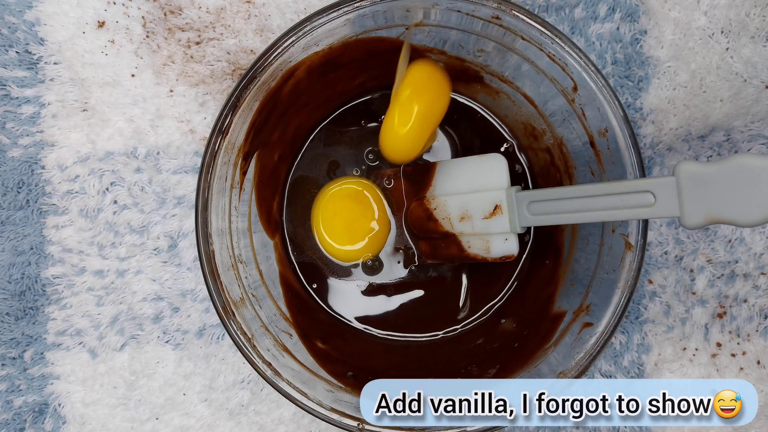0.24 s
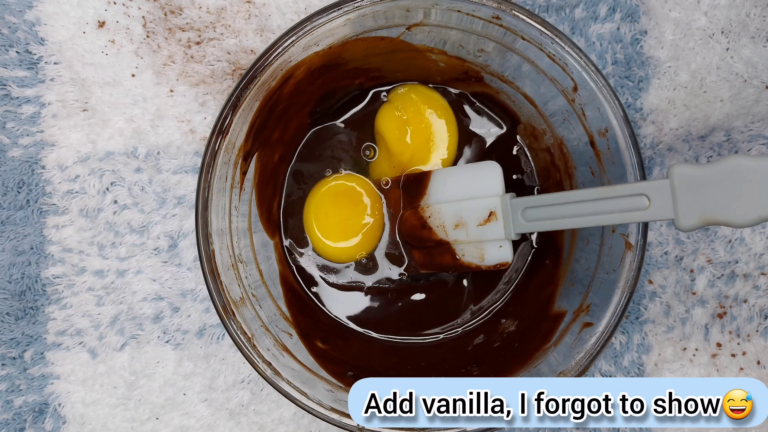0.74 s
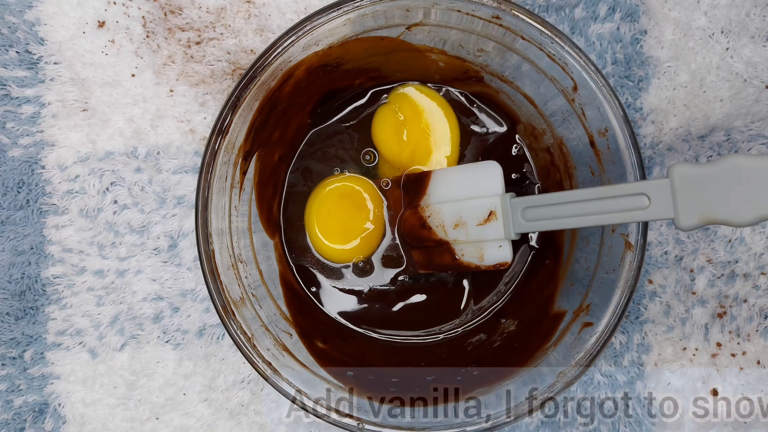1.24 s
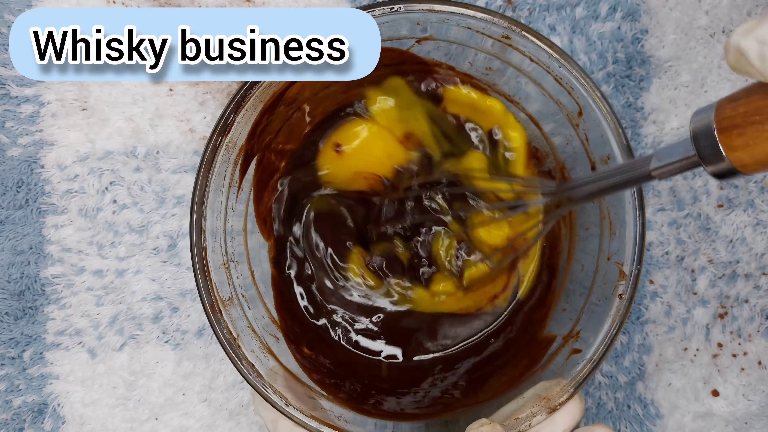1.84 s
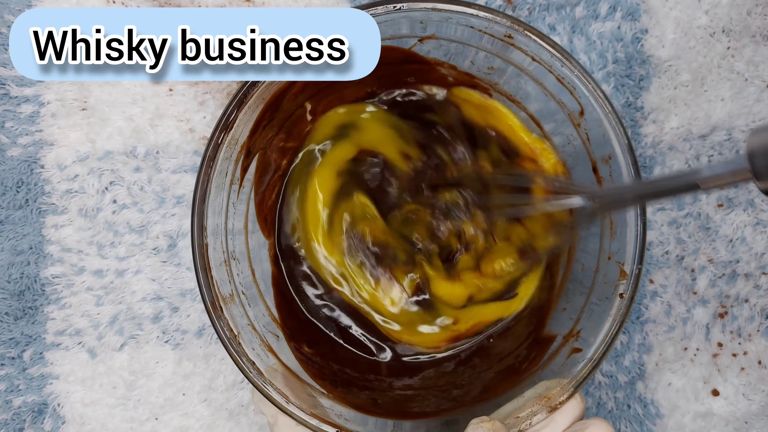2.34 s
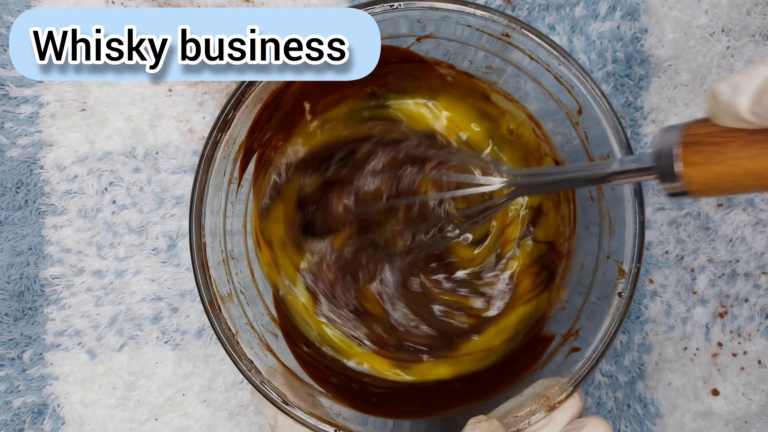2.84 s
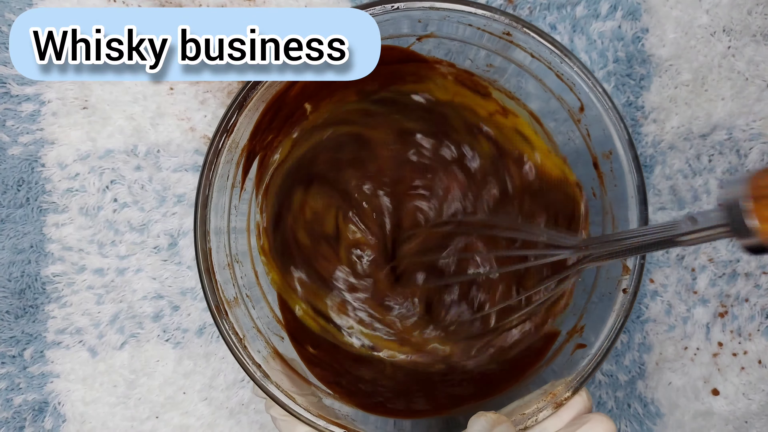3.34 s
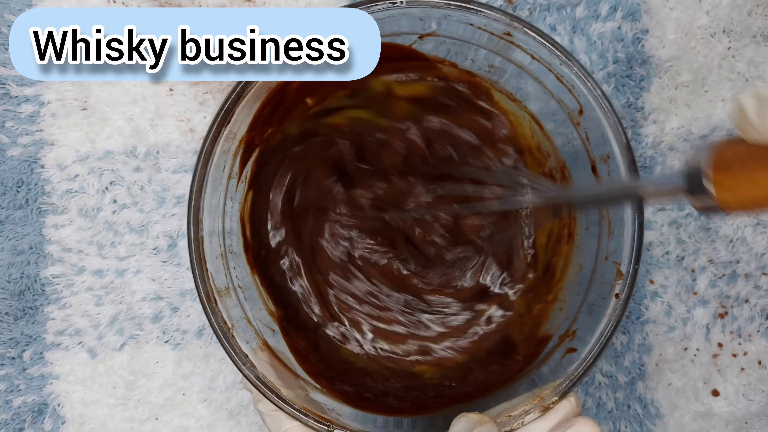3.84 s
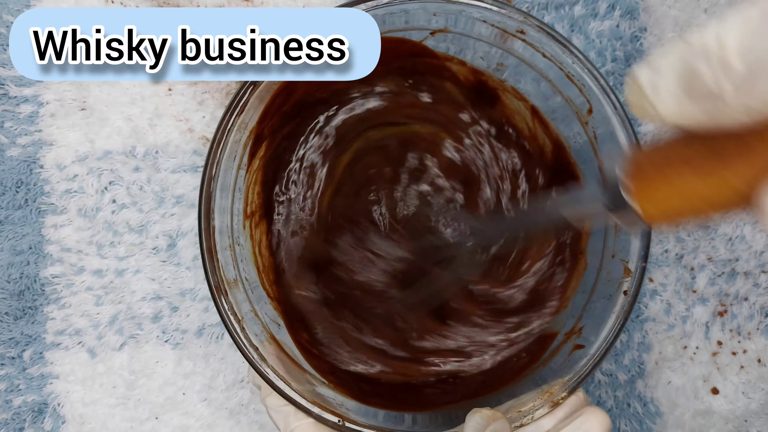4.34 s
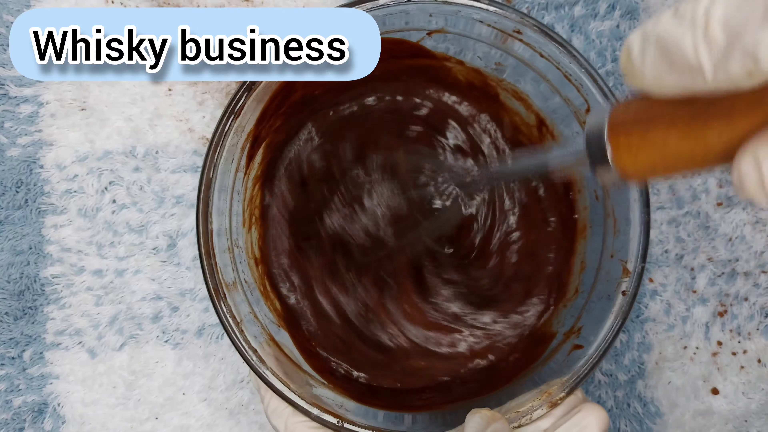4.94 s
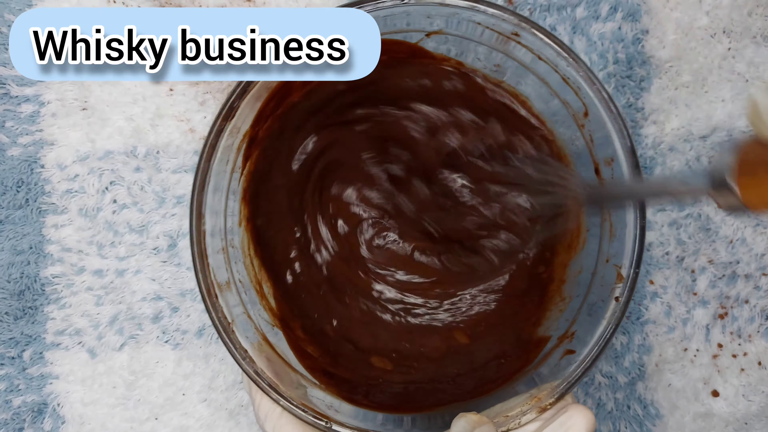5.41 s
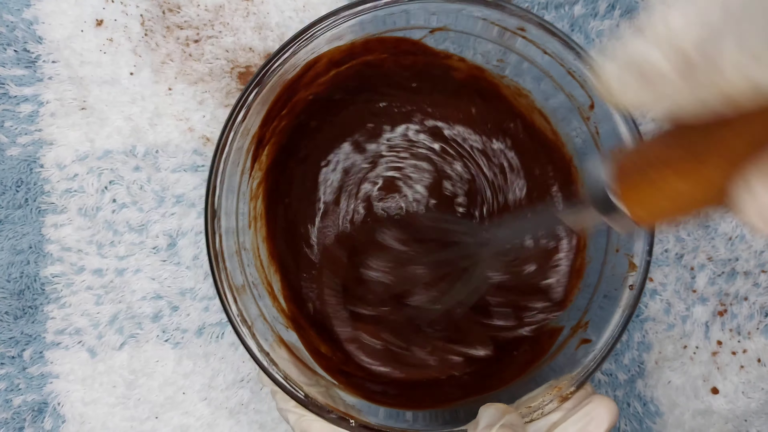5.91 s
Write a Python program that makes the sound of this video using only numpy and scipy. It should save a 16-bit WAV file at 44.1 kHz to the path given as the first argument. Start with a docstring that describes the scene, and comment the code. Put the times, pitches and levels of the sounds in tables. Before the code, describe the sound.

A faint, low fridge hum and a light hiss run throughout, in a quiet kitchen. At about 0.3 seconds an egg slides into a bowl of batter with a soft wet rustle and a small splashy plop. Only the background follows until about 1.4 seconds, when a wire whisk starts beating the thick batter, close to the microphone. The wires drag along the glass bowl in quick, uneven, scratchy swishes, roughly five a second. Sharp little ticks of single wires stand out, mixed with tiny wet pops and occasional soft knocks on the bowl wall. The glass is damped and hardly rings. The strokes are strongest around 1.8 to 2.3 seconds and again around 3.7 to 3.9 seconds. After that the swishing is somewhat softer and smoother, while the clicking carries on until the end at about 6 seconds.

```python
"""Whisking batter in a glass bowl

An egg plops in, then a wire whisk beats thick batter in a glass bowl on a towel, close under a phone
with two microphone ports. Each stroke drags the wires along the damped glass in stick-slip; single
wires tick, wet pockets pop and the wall takes soft knocks. A fridge hums over faint kitchen hiss."""
import sys
import numpy as np
from scipy import signal
from scipy.fft import rfft, irfft
from scipy.io import wavfile
from scipy.ndimage import uniform_filter1d, map_coordinates

SR = 44100
rng = np.random.default_rng(int(sys.argv[2]) if len(sys.argv) > 2 else 0)


def pcm_store(signal):
    """Save signal as 16-bit PCM."""
    levels = np.round(np.clip(np.atleast_2d(signal), -1, 1) * 32767)
    wavfile.write(sys.argv[1], SR, levels.astype(np.int16).T)


N = 272097
TIME = np.arange(N) / SR
BLOW_SAMPLES = 6000
LAG_S, LAG_WANDER_S = .00007, .00004  # the right port hears the moving whisk later
SWISH_START_S = 1.5  # from here on the wires keep swishing faintly between strokes

# rim modes of the glass, damped by batter and towel: pitch_hz, width_hz, level_db
RIM_MODES = [(1920, 155, 1.5), (2567, 230, 4.5), (2999, 153, -1), (3665, 180, -1.5), (4210, 330, -3),
             (5340, 185, -4.5)]


def undb(db):
    return 10 ** (np.asarray(db) / 20)


def unit(x):
    return x / np.sqrt(np.mean(x ** 2))


def decay(t, t60_s):
    return np.exp(-np.log(1000) * t / t60_s)


def pan(x, left_minus_right_db):
    return x * undb(np.outer([.5, -.5], left_minus_right_db))


def delay(x, lag_s):
    return map_coordinates(x, [np.arange(len(x)) - lag_s * SR], order=3)


def wander(rate_hz):
    """Smooth random drift with a spread near 1."""
    step = int(SR / rate_hz)
    held = rng.standard_normal(3000)[np.arange(N) // step]
    return 1.3 * uniform_filter1d(uniform_filter1d(held, step), step)


def ring(x, hz, width_hz):
    """One resonance, gain 1 at its centre."""
    return signal.lfilter(*signal.iirpeak(min(hz, .45 * SR), hz / max(width_hz, 1), fs=SR), x)


def body(x, modes, shift_db=0.):
    """Resonances of alternating sign; as the point of contact moves they trade the same energy."""
    gains = [undb(db + (shift_db * wander(45) if shift_db else 0)) for _, _, db in modes]
    ringing = sum((-1) ** k * gains[k] / np.sqrt(width) * ring(x, hz, width)
                  for k, (hz, width, _) in enumerate(modes))
    return ringing / np.sqrt(sum(gain ** 2 for gain in gains))


def fridge(hum_hz=174.7, drift_hz=0.78):
    """A swelling, sinking hum and wavering narrow drones, the lowest nearly alike at both ports."""
    # swell of the fridge tone: time_s, level_db
    swell = [(0.0, -62), (0.01, -61.5), (0.89, -63.5), (1.13, -55.5), (1.44, -60.5), (1.65, -56),
             (2.94, -64), (3.13, -70.5), (3.32, -62), (3.44, -74.5), (3.61, -61.5), (4.09, -59.5),
             (4.43, -57.5), (4.76, -67.5), (5.6, -61), (6.17, -62)]
    # room resonances stirred by the fridge: pitch_hz, width_hz, level_db
    drones = [(66.6, 8.2, -63.5), (109.2, 8.8, -72.5), (130.5, 27, -70), (192, 11.7, -72.5),
              (367.7, 33, -79), (658, 6.5, -85), (867, 4.4, -90.5)]
    phase = 2 * np.pi * np.cumsum(hum_hz + drift_hz * wander(5)) / SR
    hum_db = np.interp(TIME, *np.transpose(swell)) + 1.4 * wander(16)
    out = np.sqrt(2) * undb(hum_db) * np.sin(phase + np.array([[.15], [-.15]]))
    for hz, width, db in drones:
        mid, side = (unit(ring(rng.standard_normal(N), hz, width)) for _ in range(2))
        spread = min(0.15 * np.sqrt(hz / 65), 1)
        out += undb(db) * (mid + spread * side * np.array([[1], [-1]]))
    return out


def kitchen_hiss(wide_above_hz=500, lift_at_s=0.87, lift_db=2.5):
    """Room tone, centred in the bass and wide in the treble, which steps up ahead of the whisking."""
    # colour of the room tone: frequency_hz, density_db (per Hz)
    spectrum = [(25, -100), (50, -90), (80, -104.5), (110, -88), (200, -97.5), (300, -101), (500, -107),
                (1200, -117), (3000, -122), (8000, -135), (11500, -131), (13000, -126), (16000, -125)]
    hz, db = np.transpose(spectrum)
    bins_hz = np.maximum(np.fft.rfftfreq(N, 1 / SR), 1)
    colour = undb(np.interp(np.log(bins_hz), np.log(hz), db)) * np.sqrt(SR / 2)
    mid, side = rfft(rng.standard_normal((2, N))) * colour
    side *= np.clip(bins_hz / wide_above_hz, .3, 1)
    bed = irfft(np.array([mid + side, mid - side]), N)
    treble = signal.sosfilt(signal.butter(2, 2000, "high", fs=SR, output="sos"), bed)
    return bed + (undb(lift_db) - 1) * treble * (TIME > lift_at_s)


def egg_slide(hollow_hz=1710):
    """The egg white slides in and settles: a soft wet rustle with one resonance of the bowl's hollow."""
    # envelope of the rustle: time_s, level_db
    envelope = [(.14, -90), (.25, -78), (.3, -79), (.48, -91)]
    noise = rng.standard_normal((2, N))
    wet = unit(ring(noise, hollow_hz, 160)) + unit(ring(noise, 4400, 11000))
    return wet * undb(np.interp(TIME, *np.transpose(envelope), left=-np.inf, right=-np.inf))


def blows(events, attack_s, glide=0.042):
    """A dull blow gives one clean brief pitch, like a pocket popping; a bright one scuffs and cracks."""
    out, t = np.zeros((2, N + BLOW_SAMPLES)), np.arange(BLOW_SAMPLES) / SR
    for start_s, db, hz, treble_db, t60_s, pan_db in events:
        grit, spray = rng.standard_normal((2, BLOW_SAMPLES))
        port_spray = rng.standard_normal((2, BLOW_SAMPLES))
        envelope = decay(t, t60_s) * np.minimum(t / attack_s, 1)
        tone = np.sin(2 * np.pi * hz * t * (1 + glide * t / t60_s)) * np.minimum(1.34 * envelope, 1)
        burst = grit * envelope ** 6.25  # far shorter than the tone
        scuff = unit(ring(burst, hz, hz / 4)) + 0.65 * unit(body(burst, RIM_MODES))
        scuff += 0.41 * unit(ring(ring(burst, 2800, 5100), 2800, 5100))
        crack = ring(ring(spray + 0.68 * port_spray, 12400, 17200), 14600, 16000)
        crack *= envelope * np.minimum(t / (2.8 * attack_s), 1)
        roughness = np.interp(treble_db, [-20, -12], [.05, .85])
        core = np.sqrt(1 - roughness) * tone + np.sqrt(roughness) * scuff / np.abs(scuff).max()
        left, right = (core + undb(treble_db) * crack) / np.hypot(1, undb(treble_db))
        right = delay(right, abs(LAG_S + LAG_WANDER_S * rng.standard_normal()))
        i = int(start_s * SR)
        out[:, i:i + BLOW_SAMPLES] += pan(undb(db) * np.array([left, right]), pan_db)
    return out[:, :N]


def egg_plops():
    """The egg lands in the batter with two quick, splashy blows."""
    # the landing: start_s, level_db, pitch_hz, treble_db, t60_s, pan_db
    plops = [(.255, -47, 1710, 5.5, 0.049, -1), (.283, -54.5, 1670, 20, 0.042, 2.2)]
    return blows(plops, attack_s=0.0007)


def whisk_contact(swish_db=-71, swish_fade_s=0.33, swing_db=20):
    """Level, treble and wall ring in dB over time; where strokes overlap the stronger sets the colour."""
    # wire strokes along the glass: full_contact_s, level_db, rise_s, hold_s, fall_s, treble_db, wall_db
    strokes = [(1.323, -71, .08, 0.007, 0.076, -9, -29), (1.437, -63, 0.034, .002, .03, -1, -28),
               (1.632, -44, 0.021, 0.023, 0.059, -3.5, -12),
               (1.849, -33.5, 0.034, 0.0036, 0.022, -1.5, -12),
               (2.019, -32, 0.053, 0.012, 0.038, -1.5, -14.5), (2.129, -42, 0.031, 0.0061, 0.085, -9, -8.5),
               (2.206, -34, 0.049, .002, 0.017, 0.5, -14.5), (2.298, -38, 0.0056, 0.0025, 0.079, -7, -10.5),
               (2.512, -47.5, 0.043, .002, 0.044, 2.5, -11), (2.69, -45, 0.019, .002, 0.014, -2, -12),
               (2.87, -54, .012, 0.018, 0.19, -22, -6), (2.916, -41.5, 0.053, 0.0023, 0.065, 0, -12.5),
               (3.11, -47.5, 0.067, 0.0018, 0.043, -1, -9.5), (3.267, -40, 0.032, 0.027, 0.036, -2.5, -13),
               (3.429, -47.5, 0.0091, 0.0076, 0.041, -8, -7),
               (3.46, -39, 0.041, 0.0017, 0.039, -3.5, -14.5),
               (3.677, -27.5, 0.043, .021, 0.0099, -2, -13.5), (3.805, -50.5, 0.061, .002, 0.033, -3, -11),
               (3.847, -39.5, 0.015, 0.011, 0.037, 3, -20.5),
               (3.873, -31.5, 0.052, 0.0017, 0.021, -3, -12.5), (4.05, -40.5, 0.091, .002, 0.02, -3.5, -16),
               (4.205, -52, 0.094, 0.0016, 0.09, -1, -6), (4.39, -50.5, 0.055, .005, 0.15, -6, -5.5),
               (4.56, -52, 0.024, 0.075, 0.14, -4, -14), (4.788, -42.5, 0.051, 0.01, 0.056, -9, -15.5),
               (4.872, -47, 0.039, 0.0018, 0.063, -6.5, -9), (4.99, -50.5, 0.059, 0.054, 0.049, -7, -10),
               (5.161, -50.5, 0.082, 0.016, 0.12, 0, -8), (5.236, -42, 0.022, 0.0018, 0.037, -1, -7.5),
               (5.384, -53.5, 0.094, 0.0018, 0.033, -5, -12.5), (5.55, -55.5, 0.28, .002, 0.083, -2, -8),
               (5.631, -45.5, 0.036, .002, 0.061, -3.5, -5), (5.774, -50, 0.082, .002, 0.11, -0.5, -9.5),
               (5.957, -56.5, 0.22, 0.028, 0.44, -6, -13), (6.027, -50.5, .03, .002, 0.1, -2.5, -3)]
    power = undb(swish_db) ** 2 * np.clip((TIME - SWISH_START_S) / swish_fade_s, 1e-6, 1)
    treble_sum, wall_sum = 1.5 * power, -15 * power  # the swish's colour in dB, weighted by power
    for at_s, db, rise_s, hold_s, fall_s, treble_db, wall_db in strokes:
        away = np.maximum((at_s - TIME) / rise_s, 0) + np.maximum((TIME - at_s - hold_s) / fall_s, 0)
        stroke_power = undb(db - swing_db * away) ** 2
        power += stroke_power
        treble_sum += treble_db * stroke_power
        wall_sum += wall_db * stroke_power
    return 10 * np.log10(power), treble_sum / power, wall_sum / power


def whisk_drag(slips_per_s=2400, rub=0.7, chatter_db=3.5, spread=0.9, shift_db=7.5):
    """Dense uneven slips over a smooth rub ring the glass; wires catch and let go in bunches."""
    # low modes of the damped bowl wall: pitch_hz, width_hz, level_db
    wall_modes = [(380, 330, -15), (653, 59, -6), (931, 103, 0.5), (1327, 220, -4)]
    # modes of the wires: pitch_hz, width_hz, level_db
    wire_modes = [(5980, 330, 0.5), (10810, 140, 8.5), (12400, 220, -10), (13400, 190, 6),
                  (13900, 420, -11)]
    level_db, treble_db, wall_db = whisk_contact()
    chance, size = rng.random((2, N))
    slips = unit((chance < slips_per_s / SR) * undb(-2.5 * np.log(1 - size)))
    grip = np.hypot(slips, rub) * undb(chatter_db * wander(260))
    # many wires touch at once, so each port hears partly its own mix of them
    shared = grip * rng.standard_normal(N)
    per_port = grip * rng.standard_normal((2, N))
    lagged = np.array([shared, delay(shared, LAG_S + LAG_WANDER_S * wander(12))])
    rim_drive = lagged + spread * per_port
    wire_drive = lagged + 0.71 * spread * per_port
    scrape = unit(ring(ring(rim_drive, 4570, 6140), 4440, 6100))
    sheen = unit(ring(ring(wire_drive, 11100, 10900), 11800, 11000))
    rim = unit(unit(body(rim_drive, RIM_MODES, shift_db)) + undb(-3) * scrape)
    wires = unit(unit(body(wire_drive, wire_modes, shift_db)) + undb(5) * sheen)
    wall = unit(body(shared + per_port, wall_modes, shift_db))
    friction = rim + undb(treble_db) * wires + undb(wall_db) * wall
    return pan(friction * undb(level_db), 1 + 2.1 * wander(25.07))


def wire_ticks():
    """Single wires tick on the rim and wet pockets pop, standing out from the drag."""
    # accents of the whisking: start_s, level_db, pitch_hz, treble_db, t60_s, pan_db
    accents = [(1.4332, -44, 4160, -6, 0.039, 0), (1.6306, -41, 4110, -12, 0.05, 7),
               (1.6555, -35.5, 2530, -3, 0.049, 8), (1.8278, -30, 2886, -13, 0.01, 8),
               (1.8424, -29, 3790, -11, 0.019, 14), (1.8502, -20.5, 3830, -6, 0.016, 8),
               (1.9595, -44, 2560, -18, 0.052, 5), (2.0185, -25, 2480, 4, 0.046, 6),
               (2.0622, -22, 3680, -9, 0.0098, -1), (2.1286, -29, 1240, -23, 0.022, 7),
               (2.1964, -22.5, 4050, -8, 0.03, 5.5), (2.3, -24, 1850, -14, 0.02, -7),
               (2.3164, -40, 2720, -10, 0.022, 0), (2.3277, -38.5, 2630, 1, 0.032, 2),
               (2.3827, -31, 5650, -13.5, 0.0055, -7.5), (2.4713, -42, 1510, 7, 0.0065, -2),
               (2.4907, -32.5, 5790, 7, 0.014, -2), (2.5118, -24.5, 4970, -14, 0.014, 10),
               (2.52, -30.5, 3200, 5, 0.014, -6), (2.6389, -45, 2600, -18, 0.0091, 8),
               (2.6675, -43.5, 4890, 13, 0.011, 1), (2.6851, -38.5, 2640, -26, 0.026, 2),
               (2.7125, -28, 3700, 9, 0.012, -2), (2.7474, -45.5, 1800, -13.5, 0.027, -3),
               (2.8672, -30.5, 4580, 17, 0.037, 1), (2.8733, -22.5, 1430, -10.5, 0.015, 5),
               (2.9185, -27.5, 1255, -15.5, 0.023, 7), (3.0694, -33, 2665, -9, 0.044, 1),
               (3.0847, -32, 4100, -15.5, 0.014, 4), (3.2082, -42.5, 1750, -12, 0.024, 3),
               (3.2592, -17.5, 2520, 0.5, 0.021, 2.5), (3.4289, -25.5, 2050, -1.5, 0.0091, 6.5),
               (3.5282, -35, 1980, -7, 0.041, -6), (3.5643, -41, 3647, -6, 0.014, 7),
               (3.5922, -44.5, 1890, -11, 0.061, 0), (3.6192, -34.5, 2020, -28, 0.016, 10),
               (3.6333, -23, 3180, -2, 0.022, 3), (3.6765, -44, 2750, -7, 0.018, 0),
               (3.6858, -21, 2730, 3, 0.013, 0), (3.7952, -35.5, 2520, -19, 0.0044, 10),
               (3.8091, -22.5, 1940, -14, 0.025, 4), (3.8715, -23.5, 1900, -8, 0.036, -2),
               (3.9976, -40, 3000, -3, 0.012, 6), (4.038, -33, 2930, -3, 0.035, 1),
               (4.138, -38.5, 6300, -1, 0.005, 11), (4.1818, -28, 2840, 2, 0.0095, 3),
               (4.2074, -28.5, 1340, -7, 0.027, 2), (4.4459, -33, 2820, -12, 0.024, 3),
               (4.567, -41.5, 1900, -27, 0.02, 0), (4.6076, -35, 1110, -3, 0.015, 4),
               (4.6342, -27, 3970, -9.5, 0.031, 5), (4.7327, -38.5, 3680, -5, 0.039, 3),
               (4.7673, -33, 1940, -1.5, 0.02, 0), (4.7947, -21.5, 1960, -32, 0.014, 2.5),
               (4.8802, -33, 1450, -15.5, 0.036, 0), (4.9858, -24, 2040, -17.5, 0.012, 6.5),
               (5.0157, -32.5, 5400, 0, 0.019, 2), (5.044, -36.5, 4730, -10, 0.037, -2),
               (5.0573, -30, 4140, -5.5, 0.015, 0), (5.1194, -39.5, 2990, -16, 0.015, 1),
               (5.1574, -19.5, 1914, -13, 0.017, 4.5), (5.1851, -29.5, 3920, -2, 0.01, -3),
               (5.2364, -27.5, 2740, -8, 0.021, 4), (5.3484, -42, 2030, -22, 0.0078, 9),
               (5.3822, -33.5, 6730, -6, 0.041, 0), (5.4605, -44, 2750, -10, 0.044, 2),
               (5.4987, -37, 2860, -7, 0.013, 4), (5.5188, -36.5, 2043, -5, 0.0083, 6),
               (5.5602, -30.5, 2460, -4, 0.021, 1), (5.5819, -45, 5900, 18, 0.041, 1),
               (5.6314, -34.5, 2980, -15.5, 0.023, -6), (5.7741, -22, 2452, -2.5, 0.014, 6),
               (5.8697, -43.5, 4340, 0, 0.027, 1), (5.9241, -40.5, 3050, -21, 0.0091, 4),
               (5.972, -34, 4100, -10, 0.037, 2), (6.0325, -32.5, 3960, -10, 0.032, 10),
               (6.0583, -40, 2690, -14, 0.069, -2), (6.1634, -46.5, 6100, 8, 0.036, 5)]
    return blows(accents, attack_s=0.00024)


def batter_pops(count=200, lowest_hz=1300, octaves=1.88, t60_s=0.018, attack_s=0.00074):
    """Small air pockets in the sticky batter pop at random, louder where the wires press harder."""
    contact_db = whisk_contact()[0]
    out, t = np.zeros((2, N + BLOW_SAMPLES)), np.arange(BLOW_SAMPLES // 8) / SR
    envelope = decay(t, t60_s) * np.minimum(t / attack_s, 1)
    for when, pitch, size, place in rng.random((count, 4)):
        i = int((SWISH_START_S + when * (N / SR - SWISH_START_S)) * SR)
        level_db = contact_db[i] - 6.5 - 3.5 * np.log(1 - size)  # mostly under the drag, a few above
        pop = np.sin(2 * np.pi * lowest_hz * 2 ** (octaves * pitch) * t) * envelope
        out[:, i:i + len(t)] += pan(undb(level_db) * pop, 8 * place - 2)
    return out[:, :N]


def wall_knocks(rise_s=0.0025, glide=0.043, wobble_db=1.5):
    """Each knock swells in a few milliseconds, glides up a little and dies unevenly in the batter."""
    # soft knocks that each set one low wall mode humming: start_s, level_db, pitch_hz, t60_s
    knocks = [(1.842, -57, 302, 0.03), (1.96, -47.5, 920, 0.03), (2.007, -52, 310, 0.023),
              (2.022, -44, 947, 0.045), (2.203, -44, 900, 0.027), (2.297, -50, 345, 0.014),
              (2.32, -56, 637, 0.088), (2.914, -55.5, 400, 0.044), (3.45, -57, 295, 0.12),
              (3.613, -46.5, 880, 0.072), (3.685, -35, 902, 0.039), (3.86, -48.5, 650, 0.079),
              (3.968, -50, 910, 0.077), (4.04, -55.5, 652, 0.1), (4.362, -49, 898, 0.047),
              (4.553, -50, 855, 0.046), (5.015, -52, 950, 0.037), (5.128, -51, 872, 0.17),
              (5.236, -51, 1020, 0.064), (5.628, -56, 1070, 0.072), (5.716, -55, 228, 0.1),
              (5.77, -44, 340, 0.01), (5.923, -52, 880, 0.087)]
    out, t = np.zeros(N + BLOW_SAMPLES), np.arange(BLOW_SAMPLES) / SR
    for start_s, db, hz, t60_s in knocks:
        swell = (1 - np.exp(-t / rise_s)) * decay(t, t60_s)
        tone = np.sin(2 * np.pi * hz * t * (1 + glide * t / t60_s))
        i = int(start_s * SR)
        out[i:i + BLOW_SAMPLES] += undb(db) * swell / swell.max() * tone
    return pan(out[:N] * undb(wobble_db * wander(150)), left_minus_right_db=4)


def reverb(x, t60_s, samples):
    """A diffuse tail of unit energy, different at each port."""
    tail = rng.standard_normal((2, samples)) * decay(np.arange(samples) / SR, t60_s)
    tail /= np.sqrt(np.sum(tail ** 2, axis=1, keepdims=True))
    return signal.fftconvolve(x, tail, axes=1)[:, :N]


def scene():
    """Egg and whisk echo in the bowl's hollow and the duller kitchen, over fridge and room tone."""
    near = egg_slide() + egg_plops() + whisk_drag() + wire_ticks() + batter_pops() + wall_knocks()
    hollow = reverb(near, t60_s=0.11, samples=1500)
    dulled = signal.lfilter(*signal.butter(1, 7700, fs=SR), near)
    kitchen = reverb(dulled, t60_s=0.32, samples=18000)
    return near + undb(-11) * hollow + undb(-12) * kitchen + fridge() + kitchen_hiss()


def record(dry):
    """The phone cuts the top steeply."""
    return signal.sosfilt(signal.ellip(10, .2, 75, 15900, fs=SR, output="sos"), dry)


dry = scene()
out = record(dry)
pcm_store(out)
```